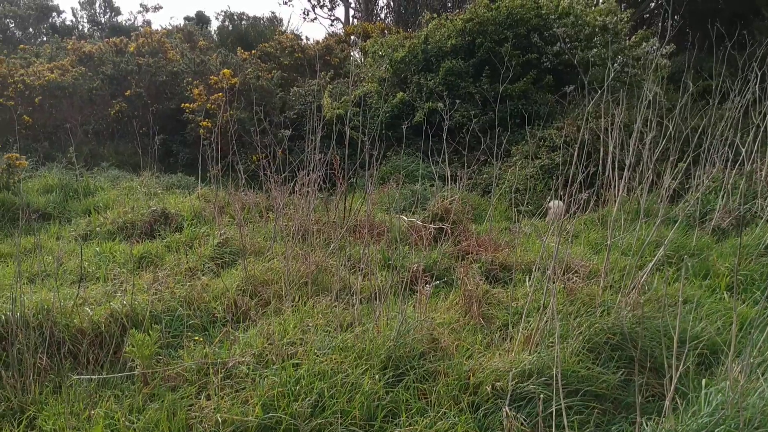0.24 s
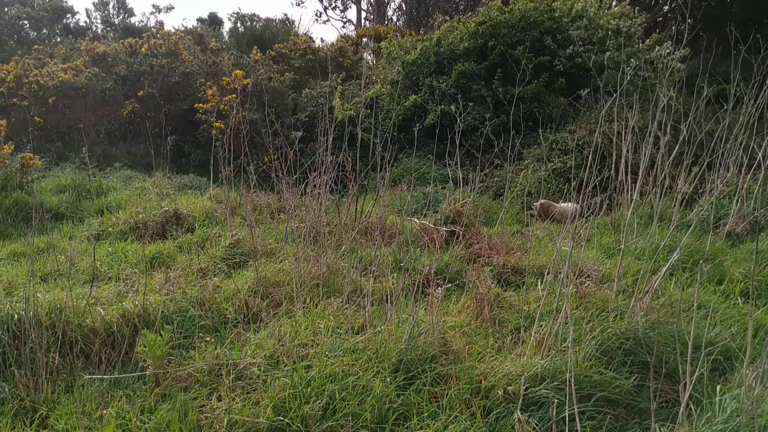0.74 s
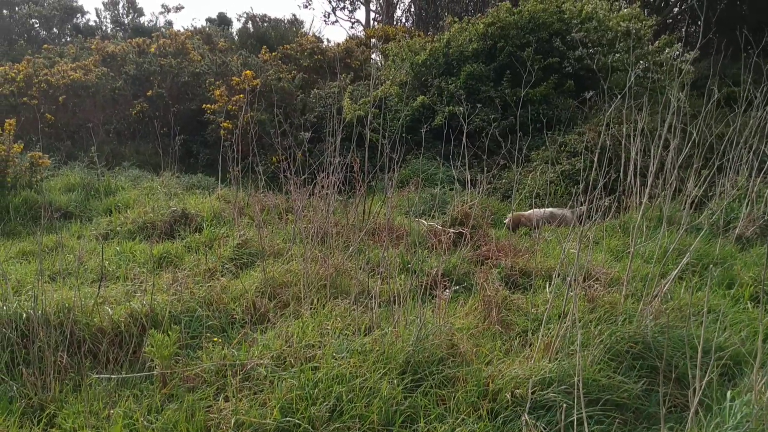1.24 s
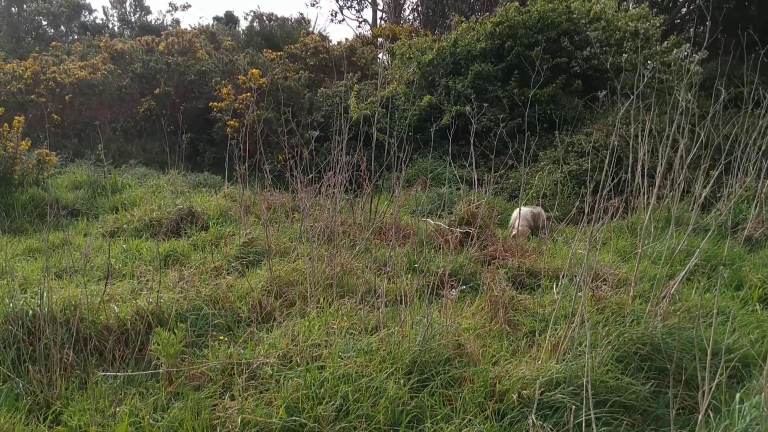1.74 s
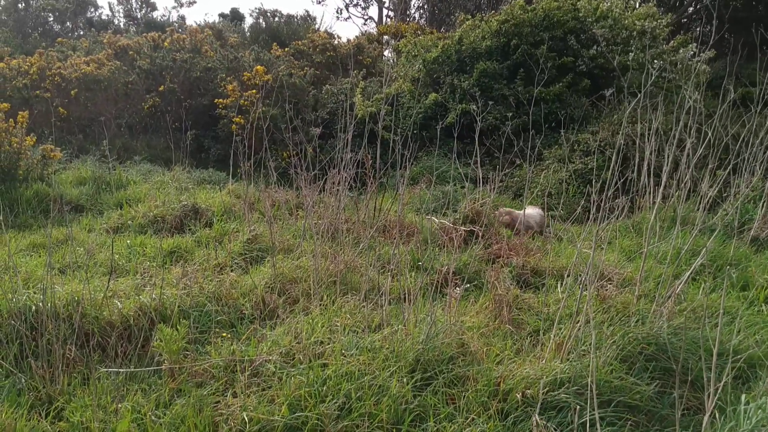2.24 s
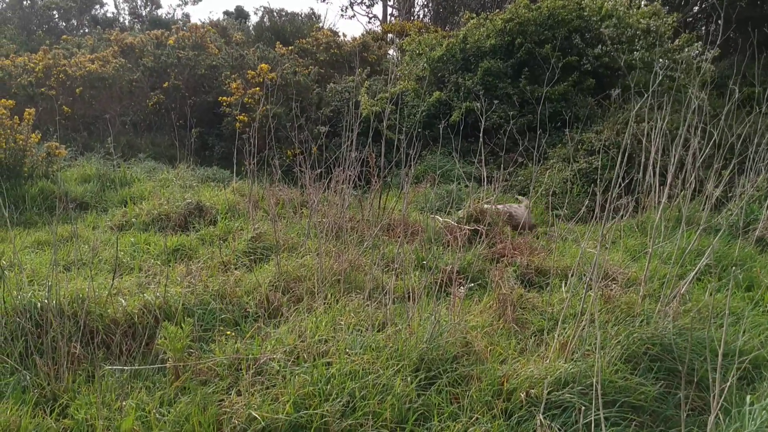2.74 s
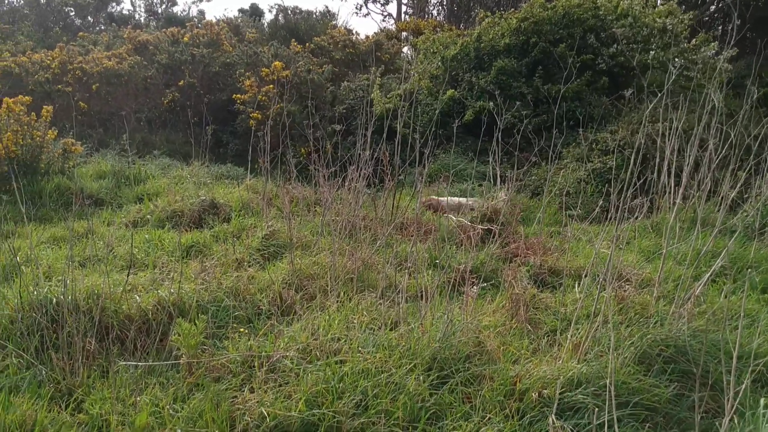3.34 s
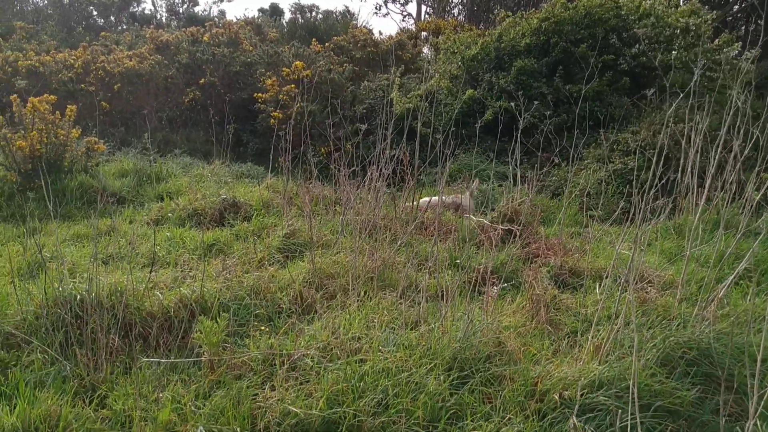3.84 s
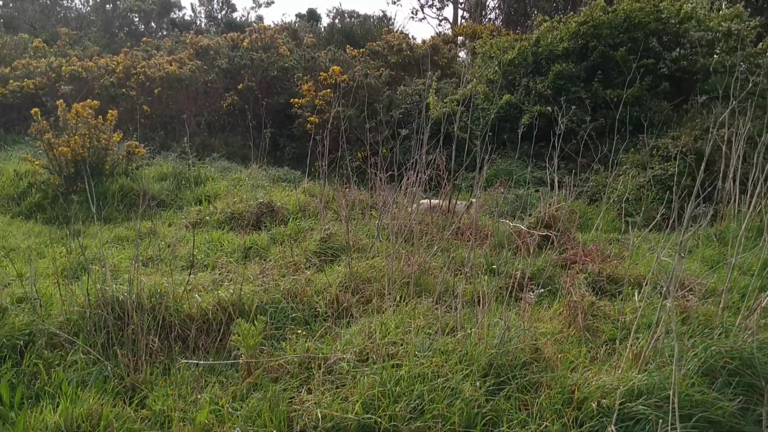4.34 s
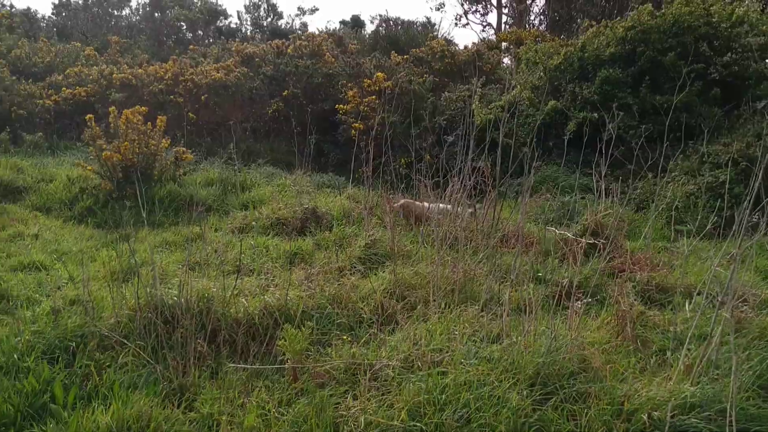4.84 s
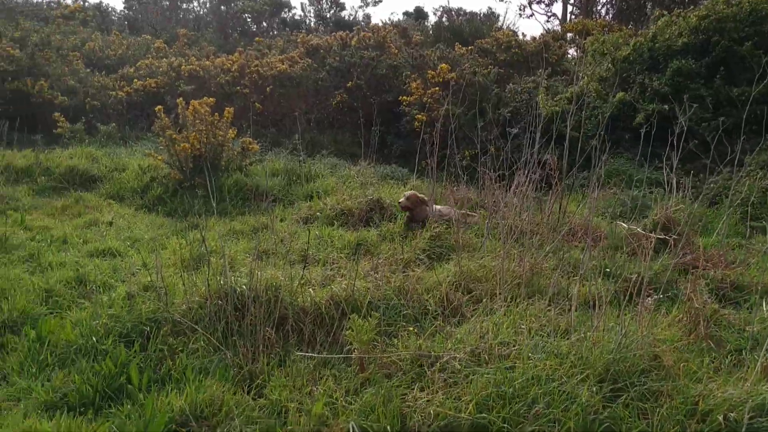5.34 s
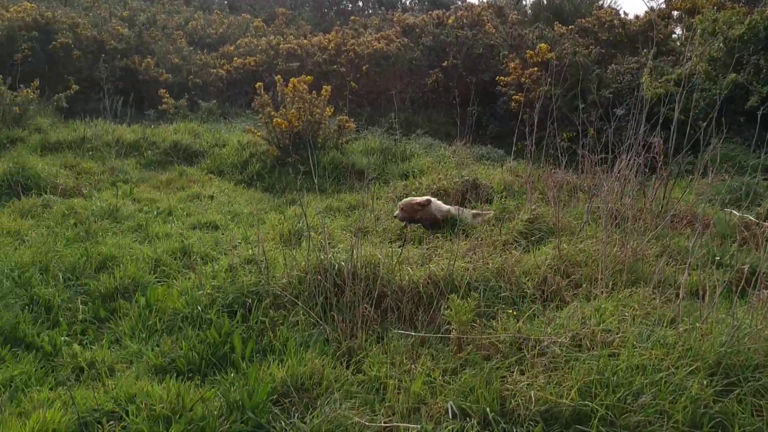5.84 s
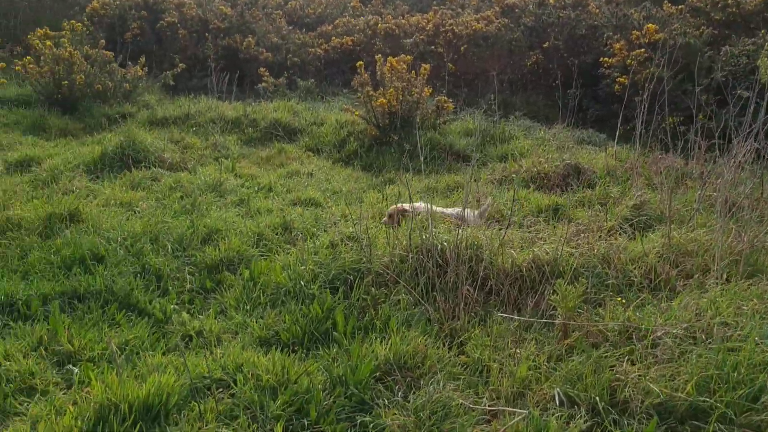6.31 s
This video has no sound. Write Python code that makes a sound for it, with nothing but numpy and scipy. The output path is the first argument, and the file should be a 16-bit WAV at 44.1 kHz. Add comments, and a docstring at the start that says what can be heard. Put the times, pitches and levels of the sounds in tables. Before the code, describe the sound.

Shrill short yelps and two longer wavering bays from a dog outdoors, with growing low wind thumps, faint bird chirps and grass rustle.

```python
"""Eight high yelping cries of a hound on a scent, across a rough meadow; scrub and trees answer faintly.
Each cry is a stack of vocal-fold harmonics through throat resonances, with noise for the breath.
Wind noise buffets both microphone ports, harder in the second half, over a faint rustle of grass.
Small birds, gliding sine tones, chirp in the bushes; stalks, short noise bursts, snap close by."""
import sys
import numpy as np
from scipy import signal
from scipy.fft import rfft, irfft, next_fast_len
from scipy.io import wavfile
from scipy.ndimage import uniform_filter1d, minimum_filter1d, map_coordinates

SR = 44100
rng = np.random.default_rng(int(sys.argv[2]) if len(sys.argv) > 2 else 0)


def output_pcm(signal):
    """Save a mono or channel-first signal as 16-bit PCM at the path in sys.argv[1].

    Samples are clipped to [-1, 1] before scaling.
    """
    pcm = np.clip(np.atleast_2d(signal).T, -1, 1) * 32767
    wavfile.write(sys.argv[1], SR, np.round(pcm).astype(np.int16))


N = 289737
TIME = np.arange(N) / SR


def amp(db):
    """Decibels to gain."""
    return 10 ** (np.asarray(db) / 20)


def unit(x):
    """Scaled to rms 1."""
    return x / np.sqrt(np.mean(x ** 2) + 1e-20)


def along(points, hz):
    """(Hz, value) points read on a log frequency axis."""
    f, v = np.transpose(points)
    return np.interp(np.log(hz + 1), np.log(f + 1), v)


def curves(rows, t=TIME):
    """Each column after the time, read at times t along straight lines."""
    s, *cols = np.transpose(rows)
    return [np.interp(t, s, c) for c in cols]


def glides(rows, t):
    """Each column after the time, joined by smooth arcs that never overshoot."""
    s, *cols = np.transpose(rows)
    cols, step = np.array(cols), np.maximum(np.diff(s), 1 / SR)
    chord = np.diff(cols) / step
    a, b = chord[:, :-1], chord[:, 1:]
    # the harmonic mean of neighbouring slopes, flat at every peak and dip
    inner = 2 * np.maximum(a * b, 0) / (a + b + 1e-9)
    slope = np.c_[chord[:, 0], inner, chord[:, -1]]
    i = np.clip(np.searchsorted(s, t) - 1, 0, len(step) - 1)
    u = np.clip((t - s[i]) / step[i], 0, 1)
    bend = (1 - u) * (slope[:, i] - chord[:, i]) - u * (slope[:, i + 1] - chord[:, i])
    return cols[:, i] + step[i] * u * (chord[:, i] + (1 - u) * bend)


def wobble(rate, size=N):
    """A smooth random curve with rate knots a second."""
    knots = rng.standard_normal(int(size * rate / SR) + 4)
    return map_coordinates(knots, [np.arange(size) * rate / SR], mode="nearest")


def filtered(x, response):
    """x times a response of frequency."""
    m = next_fast_len(N + SR // 2)
    return irfft(rfft(x, m) * response(np.fft.rfftfreq(m, 1 / SR)), m)[..., :N]


def noise(spectrum):
    """Coloured noise of rms 1, unrelated left and right."""
    white = rng.standard_normal((2, N))
    return unit(filtered(white, lambda hz: amp(along(spectrum, hz))))


def sides(left_db):
    """Left and right gains of mean power 1 for a level difference."""
    pair = amp(np.array([[.5], [-.5]]) * left_db)
    return pair / np.sqrt(np.mean(pair ** 2, axis=0))


def gate(t, start, end, rise, fall):
    """1 between start and end, with smooth shoulders inside."""
    ramp = np.minimum((t - start) / rise, (end - t) / fall)
    return np.sin(np.pi / 2 * np.clip(ramp, 0, 1)) ** 2


def add(track, s, sound):
    """Mix a sound into a track from time s on."""
    part = track[..., max(round(s * SR), 0):][..., :sound.shape[-1]]
    part += sound[..., :part.shape[-1]]


SCOOP_OCTAVES, SCOOP_S = 0.33, 0.01  # every cry slides in from above
SWELL_DB, SWELL_S = 16.5, 0.0098  # and swells from this far down, the fundamental from half as far
FLIP_S, SAG_WAIT_S = 0.0084, 0.0055  # how long the flip takes; pause before the sag
SHUT_S, SHUT_DB, SHUT_EDGE_DB = 0.011, 17.5, 3.5  # mouth shutting: time, loss of overtones, of edge


def attack_and_release(age, past_flip, controls, flip_octaves, sag):
    """Every cry swells and scoops from above, then flips register while the mouth shuts."""
    pitch, level_db, open_db, edge_db = controls
    flipped = (1 + np.tanh(past_flip / FLIP_S)) / 2
    octaves = SCOOP_OCTAVES * np.exp(-age / SCOOP_S) + flip_octaves * flipped
    octaves = octaves - sag * np.maximum(past_flip - SAG_WAIT_S, 0)
    weak_db = SWELL_DB * np.exp(-age / SWELL_S)
    shut = np.clip(past_flip / SHUT_S, 0, 1)
    open_db = open_db - weak_db - SHUT_DB * shut
    edge_db = edge_db - weak_db - SHUT_EDGE_DB * shut
    return pitch * 2 ** octaves, level_db - weak_db / 2, open_db, edge_db


# resonances of throat and mouth: pitch_hz [Hz], level_db [dB]
THROAT = [(750, 0), (1550, -2), (2000, -4.5), (2500, -5), (3100, -23), (3700, -56.5), (4600, -32),
          (5250, -34.5), (6100, -30.5), (8000, -34.5), (9100, -51), (10400, -32.5), (12300, -49.5),
          (14500, -65)]
# the folds break into half-pitch vibration: start_s [s], length_s [s], half_pitch_db [dB], chaos [0-1]
BREAKS = [(0.682, 0.04, -10, 0.28), (0.706, 0.05, -12, 0.1), (4.755, 0.16, -24, 0.12),
          (5.608, 0.03, -28, 0.1)]
# air in the voice: time_s [s], level_db [dB]
HOARSE = [(0, -39), (1.5, -38), (2.2, -30), (4.3, -31), (5, -30.5), (5.6, -28), (6.2, -28)]
# the hound crosses to the centre: time_s [s], left_share [0-1]
BEARING = [(0, 0.35), (2.3, 0.37), (3.3, 0.17), (4.7, 0.1), (6.2, 0.09)]
# left port's lead for a hound fully left: pitch_hz [Hz], lead [radians]
LEAD = [(0, 1.03), (2800, 3.7), (5800, 6.9), (9000, 4.2), (12300, 3.5)]
# level between the ports: pitch_hz [Hz], left_minus_right_db [dB]
LEFTWARD = [(800, 1.5), (1600, 3.5), (2600, 2.5), (4700, -4.5), (8000, 4), (11000, 13)]
RING_HZ, RING_HZ_PER_JAW_DB = 5890, 44  # a narrow head resonance moves with the jaw
RING_CLEAN_DB = .5  # extra ring per dB of less air in the voice


def cry(t, start, flip, end, controls, flip_octaves, sag, jaw_db, air,
        ring_db=5, ring_width_hz=330, roar_db=-1, jitter=0.0022, shimmer_db=1.0, flicker_db=4.0, half_db=-42):
    """One cry: harmonics of the vocal folds sweep through the fixed throat resonances."""
    pitch, level_db, open_db, edge_db = attack_and_release(t - start, t - flip, controls, flip_octaves, sag)
    spells = [(gate(t, s, s + length, 0.0022, 0.005), db, chaos) for s, length, db, chaos in BREAKS]
    half = amp(half_db) + sum(on * amp(db) for on, db, _ in spells)
    chaos = sum(on * share for on, _, share in spells)
    pitch = pitch * (1 + jitter * wobble(260, len(t)) + 0.0395 * chaos * wobble(650, len(t)))
    phase = 2 * np.pi * np.cumsum(pitch) / SR
    # in a hoarse voice the high harmonics fray while the low ones stay clean
    hoarse_db = curves(HOARSE, t)[0]
    fray = 6.5 * amp(hoarse_db)
    ports = np.array([[.5], [-.5]]) * curves(BEARING, t)[0]
    # the folds close softly at both ends of a cry, so the treble comes last and goes first
    firm = gate(t, start, end, .016, .012)
    ringing_db = ring_db + RING_CLEAN_DB * (HOARSE[-1][1] - hoarse_db)
    ringing_hz = RING_HZ + RING_HZ_PER_JAW_DB * jaw_db
    voice = np.zeros((2, len(t)))
    for k in (np.arange(2, 37) / 2).tolist():  # harmonic number, in half steps
        hz = k * pitch
        edge = np.clip((k - 3) / 2, 0, 1)  # 0 up to the third harmonic, 1 from the fifth
        db = along(THROAT, hz) + level_db
        db = db + min(k - 1, 1) * (open_db - level_db) + edge * (edge_db - open_db)
        db = db + (shimmer_db + edge * flicker_db) * wobble(29.45, len(t))
        db = db + jaw_db * ((k == 3) - (k == 2)) / 2
        db = db + ringing_db * np.exp(-((hz - ringing_hz) / ring_width_hz) ** 2)
        gain = amp(db) * firm ** edge
        if k % 1:  # lines halfway between the harmonics
            gain = gain * half * (1 + (0.24 + chaos) * wobble(279, len(t)))
        turn = k * phase + edge * fray * wobble(450, len(t))
        lead = ports * np.interp(hz, *np.transpose(LEAD))
        voice -= gain * sides(along(LEFTWARD, hz)) * np.cos(turn + lead)
    # air hisses through once a cycle, and roars when the voice breaks
    puffs, roar = air[..., round(t[0] * SR):][..., :len(t)] * (1 + .5 * np.cos(phase))
    voice += puffs * firm * amp(-2.5 + 0.76 * edge_db + hoarse_db)
    voice += roar * chaos * amp(open_db + roar_db)
    return voice * gate(t, start, end, .008, .004)


PUSH_DB, PUSH_AT_S, PUSH_WIDTH_S = 2.5, 0.062, 0.021  # a push of breath lifts the fundamental early on


def yelp(row, air):
    """The pitch dips and climbs through a bowl, and the levels drift as it climbs."""
    (start, dip_s, flip_s, release_s, dip_hz, top_hz, flip_octaves, sag,
     level_db, drift_db, open_db, open_drift_db, edge_db, jaw_db) = row
    flip, end = start + flip_s, start + flip_s + release_s
    t = np.arange(max(start, 0), end, 1 / SR)
    climb = (np.minimum(t - start, flip_s) - dip_s) / (flip_s - dip_s)  # 0 at the dip, 1 at the flip
    push_db = PUSH_DB * np.exp(-((t - start - PUSH_AT_S) / PUSH_WIDTH_S) ** 2)
    pitch = dip_hz * (top_hz / dip_hz) ** (climb ** 2)
    controls = (pitch, level_db + drift_db * climb + push_db,
                open_db + open_drift_db * climb, edge_db + open_drift_db * climb)
    return cry(t, start, flip, end, controls, flip_octaves, sag, jaw_db, air)


BAY_FLIP_OCTAVES, BAY_RELEASE_S = 0.316, 0.023


def bay(rows, jaw_db, air):
    """A held, wavering cry that ends in an upward flip."""
    start, flip = rows[0][0], rows[-1][0]
    end = flip + BAY_RELEASE_S
    t = np.arange(start, end, 1 / SR)
    return cry(t, start, flip, end, glides(rows, t), BAY_FLIP_OCTAVES, 0, jaw_db, air)


# short yelps: start_s [s], dip_after_s [s], flip_after_s [s], release_s [s], dip_hz [Hz],
# top_hz before the flip [Hz], flip_octaves [octaves], sag [octaves per s],
# fundamental_db at the dip [dB], its change from dip to flip [dB], overtones_db at the dip [dB],
# change of overtones and edge from dip to flip [dB], shrill_edge_db at the dip [dB],
# jaw_db, third harmonic over second [dB]
YELPS = [(-0.08, 0.13, 0.22, 0.018, 900, 945, 0.42, 6, -33, -3.5, -22.5, -4, -18, 8),
         (2.136, 0.085, 0.21, 0.029, 731, 1006, 0.29, 35.5, -19, -7, -18.5, -2.5, -17.5, 2),
         (3.226, 0.082, 0.19, 0.02, 736, 900, 0.36, 0, -23, -3, -26, 3, -22.5, 2.5),
         (4.204, 0.067, 0.16, 0.035, 770.7, 998, 0.31, 38, -24.5, -6, -21, -5, -19, 6),
         (5.554, 0.048, 0.15, 0.021, 706, 1041, -0.24, 35, -23.5, -9.5, -20.5, -3.5, -15, -6),
         (6.055, 0.066, 0.15, 0.026, 737, 1065, -0.2, 30, -29, 3.5, -19, 1, -18.5, -1)]
# two drawn-out bays, start to flip: time_s [s], pitch_hz [Hz], fundamental_db, overtones_db, shrill_edge_db [dB]
FIRST_BAY = [(0.635, 779, -21.5, -21, -7.5), (0.73, 758.6, -17.5, -22, -18),
             (0.797, 830.3, -18.5, -21.0, -6.5), (0.874, 767.5, -17, -20.5, -16.5),
             (1, 759, -18.5, -24, -16), (1.11, 848.6, -24.5, -22, -13), (1.19, 826.7, -24.5, -24, -15),
             (1.28, 875.4, -28.5, -22.5, -14.5), (1.34, 856, -26, -23.5, -12.5),
             (1.465, 929, -31, -20, -20.5)]
SECOND_BAY = [(4.722, 729, -23, -21, -31), (4.79, 719, -25.5, -22, -24), (4.85, 745, -20, -23, -21.5),
              (4.914, 811.6, -16, -20, -13.5), (4.99, 758.6, -18, -22.5, -17),
              (5.05, 846, -21.5, -21.5, -16), (5.094, 931, -22, -18, -21), (5.123, 839, -21, -19.5, -10),
              (5.16, 741, -13, -23, -18.5), (5.213, 801, -23, -22.5, -11.5), (5.27, 918, -22.5, -18, -23.5)]
FIRST_JAW_DB, SECOND_JAW_DB = 1, -3  # third harmonic over second
# colour of air through the folds: pitch_hz [Hz], level_db [dB]
RASP = [(600, -73), (900, -14), (1250, 4), (2000, 8.5), (2900, -14), (3400, -31), (4100, -7), (4700, -7),
        (6500, 0.5), (9100, -7.5), (10400, 0.5), (14000, -23)]
# colour of air in a breaking voice: pitch_hz [Hz], level_db [dB]
ROAR = [(500, -28), (800, -22), (1250, 0), (1700, -2), (2600, -11), (3400, -20), (4500, -37), (7000, -13),
        (12000, -37)]


def hound():
    """Six short yelps and two long bays, all driven by the same breath noise."""
    track, air = np.zeros((2, N)), np.array([noise(RASP), noise(ROAR)])
    for row in YELPS:
        add(track, row[0], yelp(row, air))
    for rows, jaw_db in (FIRST_BAY, FIRST_JAW_DB), (SECOND_BAY, SECOND_JAW_DB):
        add(track, rows[0][0], bay(rows, jaw_db, air))
    return track * amp(2.5)


# how long the trees answer: pitch_hz [Hz], t60_s, time to fall 60 dB [s]
TREES = [(500, 0.62), (2000, 0.45), (5000, 1), (12000, 0.073)]


def trees(x, far_db, near_t60=0.041):
    """Scatter from the near scrub, then a thin long answer from the trees, as decaying noise."""
    hz, t, z = signal.stft(rng.standard_normal((2, SR)), SR, nperseg=256)
    far = amp(far_db - 60 * t / along(TREES, hz)[:, None])
    near = amp(-60 * t / near_t60)
    onset = 1 - np.exp(-t / 0.00067)
    tail = signal.istft(z * (far + near) * onset, SR, nperseg=256)[1]
    return signal.fftconvolve(x, tail / np.linalg.norm(tail[0]), axes=1)[:, :N]


# gusts at the microphone: time_s [s], strength_db [dB], left_minus_right_db before each layer's lean [dB]
WIND = [(0.0, -33, 3), (0.55, -30.5, -1), (0.82, -24.0, 12), (1.15, -27.5, -4), (1.4, -28.5, 7.5),
        (1.55, -24, 6), (2.05, -31, 9), (2.5, -27, 25.5), (2.9, -25.5, 15.5), (3.17, -36.5, 8.5),
        (3.55, -21.5, 6.5), (4.0, -21.0, 6.5), (4.24, -14.5, -11.5), (4.42, -19.0, 15), (4.62, -18.5, 1.5),
        (4.88, -13.5, -2), (5.35, -16.5, 11), (5.6, -28, 2.5), (6.0, -16, 10.5), (6.2, -23.5, -3),
        (6.35, -31, 6), (6.57, -26, -14)]
# sharp eddies: start_s [s], level_db before thump and pop gains [dB], length_s to half level [s],
# left_minus_right_db [dB]
EDDIES = [(1.549, -39.5, 0.031, 13), (2.49, -38.5, 0.018, 34), (3.583, -35.5, 0.011, 17),
          (3.848, -29, 0.022, 28), (3.873, -26.5, 0.016, 25), (3.897, -27.5, 0.0082, 25),
          (4.033, -30, 0.051, 10), (4.123, -37.5, 0.012, 13), (4.202, -36.5, 0.048, -11),
          (4.432, -28.5, 0.069, 29), (4.52, -34.5, 0.027, 33), (4.69, -24, 0.015, 33), (4.789, -25, .03, 3),
          (4.867, -18.5, 0.055, 13), (5.104, -23, 0.047, 23.5), (5.327, -23, 0.036, 22),
          (5.438, -28, 0.016, 29), (5.695, -26, 0.022, 38), (5.82, -29, 0.0079, 26),
          (5.943, -31, 0.017, 18), (6.015, -34.5, 0.022, 21)]
# colours of the deep rumble, the flutter and the eddy pops: pitch_hz [Hz], level_db [dB per Hz]
RUMBLE = [(12, -7), (25, -3), (50, -4.5), (100, -8), (160, -13.5), (250, -28.5), (500, -57), (1000, -103)]
FLUTTER = [(90, -25), (170, 0), (250, -5), (400, -15.5), (600, -28), (1000, -47), (2500, -74)]
EDDY = [(80, -41), (200, 1), (400, 1), (650, -11), (1100, -27.5), (2000, -47.5), (5000, -66)]
RUMBLE_DB = 2.5  # over the strength
FLUTTER_DB, FLUTTER_GROWS = -32, 1.57  # level at a fresh breeze; dB per dB of strength
BREEZE_DB = -22  # strength of a fresh breeze


def wind(lump_db=3.0, flutter_lump_db=6.5, thump_db=4):
    """Turbulence at each port: a deep rumble, a flutter that grows faster than it, and sharp eddies."""
    strength_db, left_db = curves(WIND)
    lumps = np.array([wobble(45) + 0.23 * wobble(12), wobble(45) + 0.47 * wobble(9.1)])
    rumble = unit(noise(RUMBLE) * amp(lump_db * lumps))
    rumble = amp(strength_db + RUMBLE_DB) * sides(0.77 * left_db - 5.0) * rumble
    flutter_db = FLUTTER_DB + FLUTTER_GROWS * (strength_db - BREEZE_DB)
    flutter = unit(noise(FLUTTER) * amp(flutter_lump_db * np.minimum(lumps, 2.3)))
    flutter = amp(flutter_db) * sides(left_db + 4) * flutter
    bursts = np.zeros((2, N))
    for s, db, length, left in EDDIES:
        bursts += amp(db) * sides(left) * gate(TIME, s, s + 2 * length, 0.0016, 2 * length)
    # an eddy thumps and breaks up into quick pops
    pops = unit(noise(EDDY) * amp(1.5 * np.tanh(wobble(160))))
    return rumble + flutter + bursts * (amp(5.5) * pops + amp(thump_db) * noise(FLUTTER))


# level of the rustle: time_s [s], level_db before its flutter [dB]
GRASS = [(0, -56), (.5, -57.5), (1.6, -57), (2.9, -57.5), (4.5, -57.5), (5.4, -52), (5.9, -55), (6.57, -54)]
# colour of the meadow's rustle: pitch_hz [Hz], level_db [dB per Hz]
MEADOW = [(300, -36), (500, 0.5), (1000, -6), (2500, -10), (4000, -18), (6400, -13), (9000, -16.5),
          (12500, -18), (15500, -36)]
# colour of blades brushing close by: pitch_hz [Hz], level_db [dB per Hz]
SWISH = [(1000, -49), (6000, -6.5), (11000, -5), (15500, -8)]


def grass():
    """A faint noisy rustle of the meadow, and a closer, brighter swish at the end."""
    swish = gate(TIME, 6.24, 7, 0.01, .1) * amp(-55 + 1.9 * wobble(60)) * noise(SWISH)
    return amp(curves(GRASS)[0] + wobble(20)) * noise(MEADOW) + swish


# stalks snapping and knocking underfoot: start_s [s], level_db before a 5 dB cut [dB],
# centre_hz [Hz], t60_s, time to fall 60 dB [s]
SNAPS = [(.282, -25.5, 616, 0.061), (0.305, -36, 655, 0.071), (.325, -37, 630, 0.076),
         (0.514, -44, 7140, 0.041), (2.018, -37, 973, 0.045), (2.046, -21.5, 1200, 0.016),
         (5.436, -37, 10600, 0.018), (6.277, -21.5, 11080, 0.00099), (6.31, -34, 10550, 0.0039),
         (6.353, -36, 9800, 0.019)]


def stalks():
    """Short decaying bursts of noise, each around its own pitch, stronger on the left."""
    track, t = np.zeros((2, N)), np.arange(SR // 10) / SR
    hz = np.fft.rfftfreq(len(t), 1 / SR) + 1
    for s, db, centre, t60 in SNAPS:
        colour = 1 / (1 + 2 * np.log2(hz / centre) ** 2) ** 2
        mid, side = irfft(rfft(rng.standard_normal((2, len(t)))) * colour, len(t))
        burst = unit(np.array([mid + 1.3 * side, mid - 0.13 * side]))
        add(track, s, amp(db - 5 - 60 * t / t60) * burst)
    return track


def whistle(contour, octave_db=-28):
    """A sine gliding through (s, Hz) points with a weaker octave, silent after 82% of the contour."""
    t = np.arange(0, contour[-1][0], 1 / SR)
    pitch = glides(contour, t)[0] * (1 + 0.0085 * wobble(400, len(t)))
    phase = 2 * np.pi * np.cumsum(pitch) / SR
    tone = np.sin(phase) + amp(octave_db) * np.sin(2 * phase)
    return gate(t / t[-1], 0, 0.82, 0.16, 0.089) * tone


# contours of two repeated calls: time_s into the call [s], pitch_hz [Hz]
SLUR = [(0, 4000), (.016, 3480), (.042, 2750)]
SWEEP = [(0, 8000), (.02, 5120), (.06, 3850), (.15, 3570)]
# when they are heard: start_s [s], level_db before the mix [dB]
SLURS = [(1.915, -47), (2.057, -49), (2.363, -43.5), (2.548, -48.5), (3.78, -53.5)]
SWEEPS = [(2.069, -49.5), (2.553, -49.5)]
# short pips with a strong octave: start_s [s], level_db before the mix [dB], glide [octaves]
PIPS = [(1.691, -51.5, 0.14), (1.834, -50, 0.18), (3.181, -49, -0.058), (3.444, -38.5, -0.38),
        (3.93, -46, 0.14), (4.677, -52.5, -0.11), (5.316, -37, -0.12), (5.992, -54, .03),
        (6.402, -42.5, -.08)]
PIP_S, PIP_HZ, PIP_OCTAVE_DB = 0.0195, 4770, -9.5  # contour length, middle pitch, octave level
# single notes: start_s [s], contour_s [s], start_hz, middle_hz, end_hz [Hz], level_db before the mix [dB]
NOTES = [(0.358, 0.16, 2950, 3610, 5200, -59), (1.629, 0.15, 2750, 2490, 2314, -61),
         (1.793, 0.07, 5900, 7000, 5260, -58), (1.91, 0.061, 6600, 7700, 7140, -55),
         (2.684, .16, 2490, 2888, 2830, -44.5), (2.93, 0.13, 2450, 2480, 2400, -61),
         (3.095, 0.058, 1335, 1400, 1370, -55), (3.147, 0.083, 1164, 1096, 1090, -52),
         (3.098, .085, 3240, 3250, 3100, -60), (3.971, 0.11, 3180, 2990, 2880, -52)]


def birds():
    """Repeated slurs, sweeps and pips, and a few single notes, all whistled."""
    track = np.zeros(N)
    for contour, calls in (SLUR, SLURS), (SWEEP, SWEEPS):
        for s, db in calls:
            add(track, s, amp(db) * whistle(contour))
    for s, db, glide in PIPS:
        contour = [(0, PIP_HZ * 2 ** (-glide / 2)), (PIP_S, PIP_HZ * 2 ** (glide / 2))]
        add(track, s, amp(db) * whistle(contour, PIP_OCTAVE_DB))
    for s, length, first, middle, last, db in NOTES:
        contour = [(0, first), (length / 2, middle), (length, last)]
        add(track, s, amp(db) * whistle(contour))
    return np.array([track, track])


def scene():
    """The hound in the open, the birds in the bushes, stalks and grass close by, wind at the microphone."""
    dog, song = hound(), birds()
    dog = dog + amp(-12) * trees(dog, far_db=-21.5)
    song = amp(-2) * song + amp(1) * trees(song, far_db=-22, near_t60=.2)
    return dog + amp(-3.0) * song + stalks() + grass() + wind()


TOP_HZ = 15850


def record(dry):
    """The camera's limiter holds the gusts under full scale; nothing is kept above its band limit."""
    needed = np.minimum(1, .88 / (np.abs(dry).max(axis=0) + 1e-9))
    gain = uniform_filter1d(minimum_filter1d(needed, size=900), size=800)
    return filtered(dry * gain, lambda hz: hz < TOP_HZ)


dry = scene()
out = record(dry)
output_pcm(out)
```